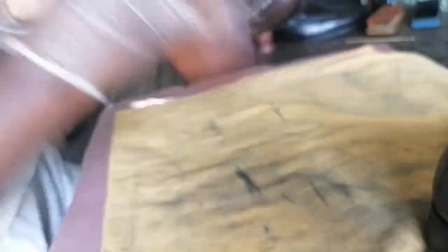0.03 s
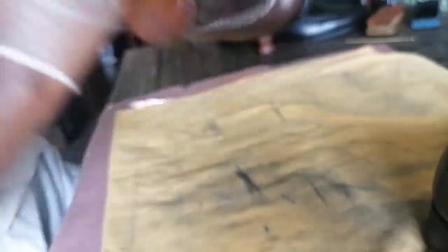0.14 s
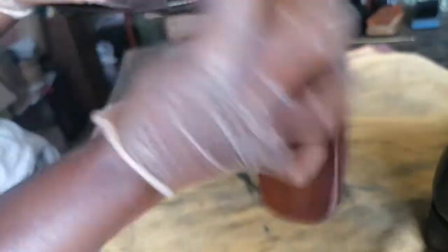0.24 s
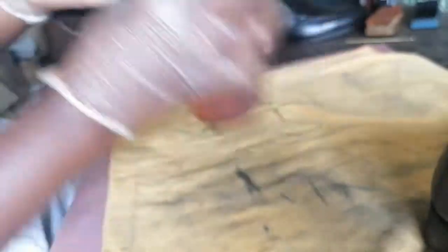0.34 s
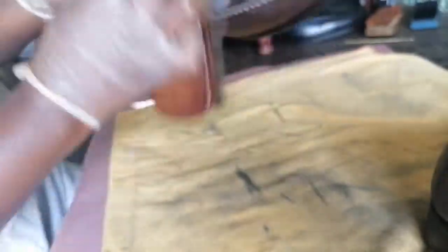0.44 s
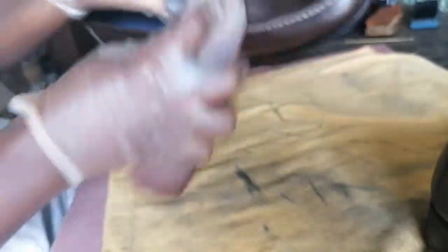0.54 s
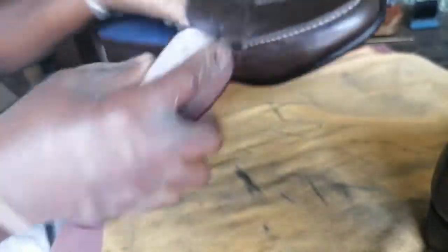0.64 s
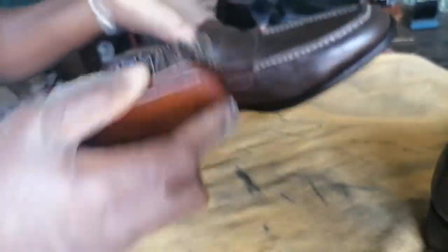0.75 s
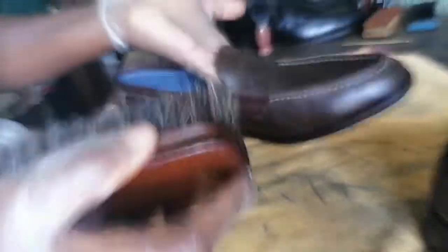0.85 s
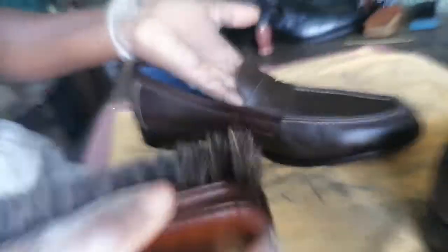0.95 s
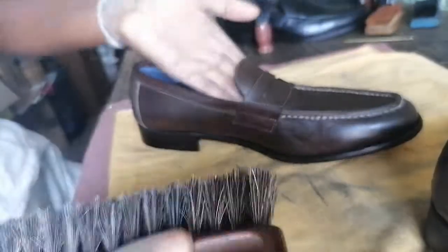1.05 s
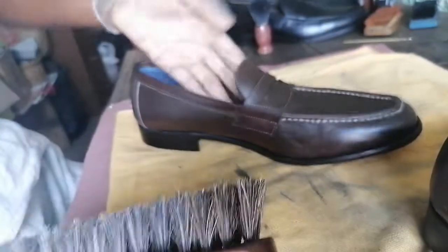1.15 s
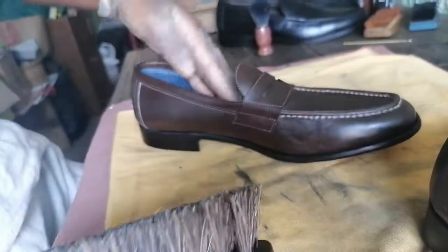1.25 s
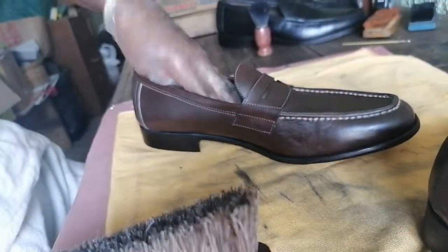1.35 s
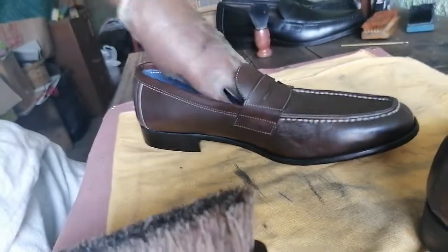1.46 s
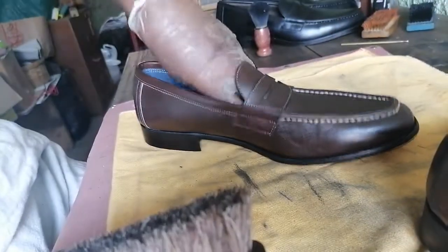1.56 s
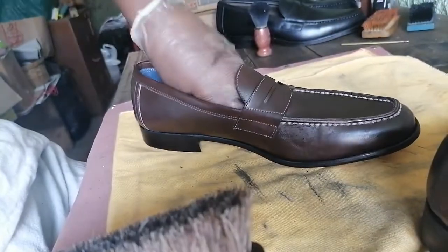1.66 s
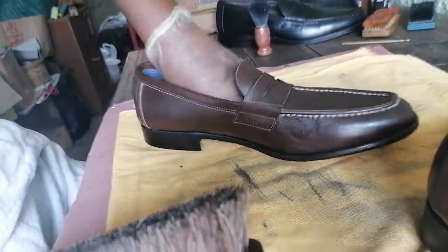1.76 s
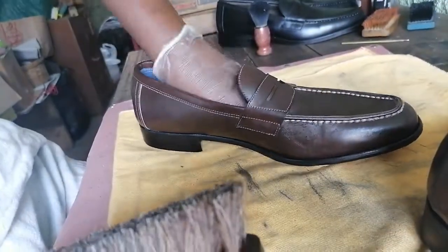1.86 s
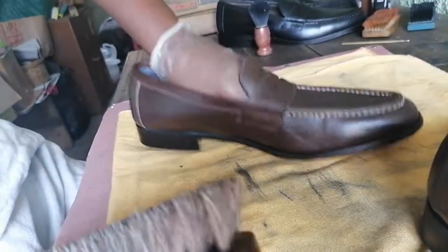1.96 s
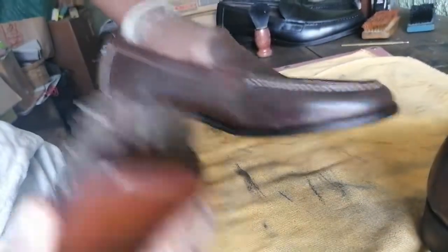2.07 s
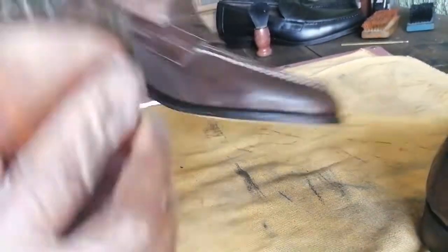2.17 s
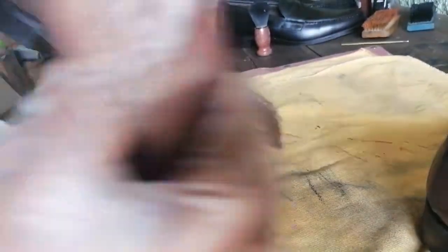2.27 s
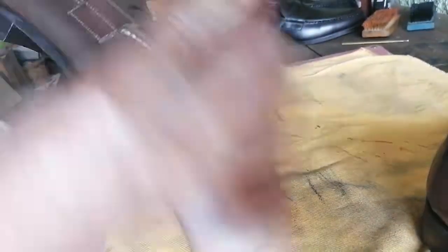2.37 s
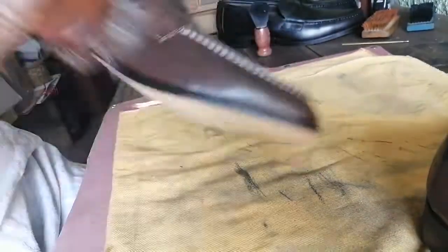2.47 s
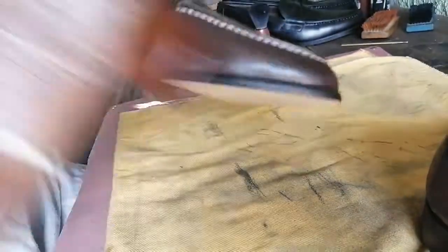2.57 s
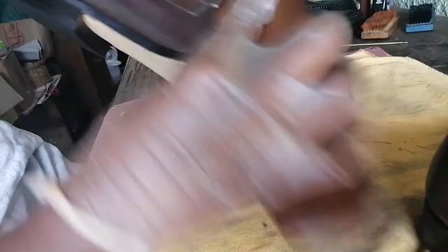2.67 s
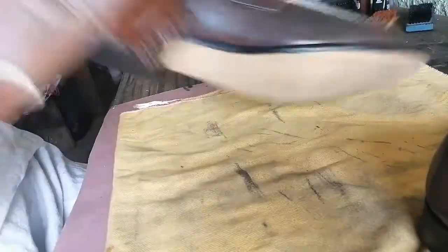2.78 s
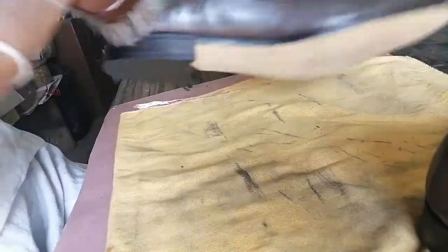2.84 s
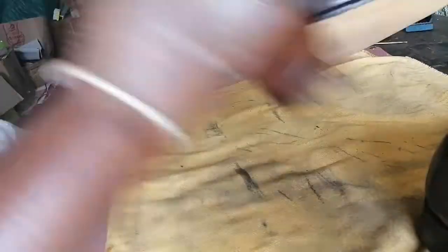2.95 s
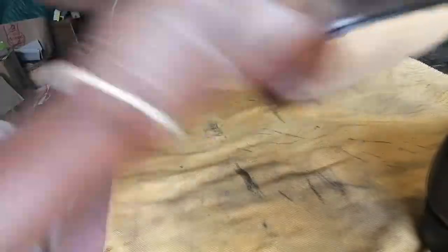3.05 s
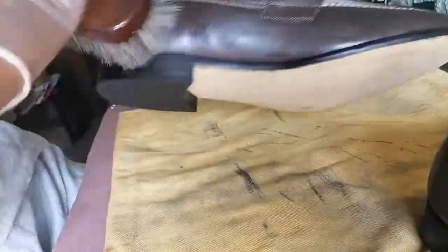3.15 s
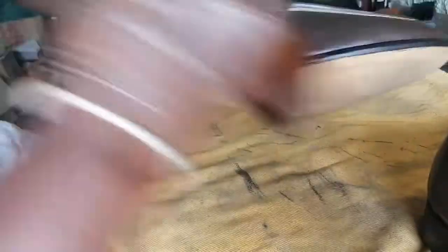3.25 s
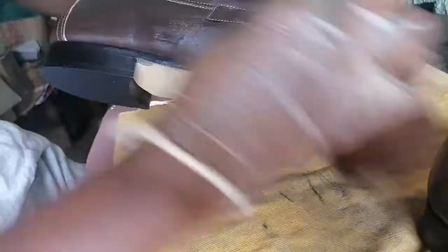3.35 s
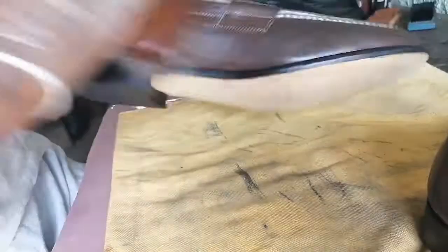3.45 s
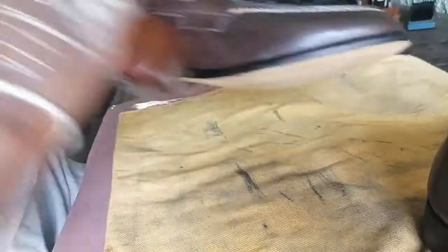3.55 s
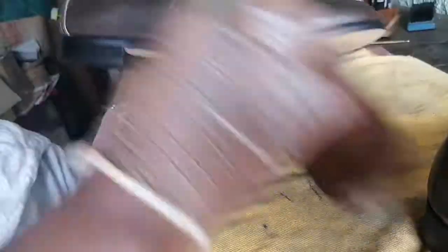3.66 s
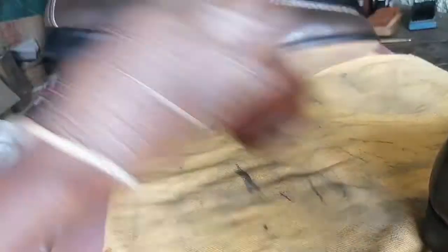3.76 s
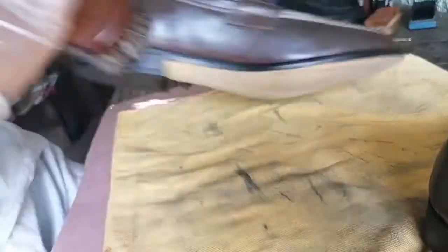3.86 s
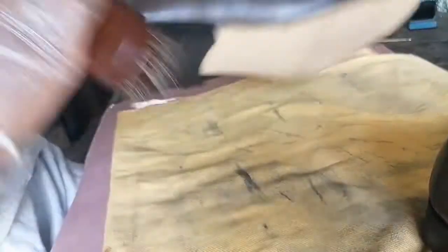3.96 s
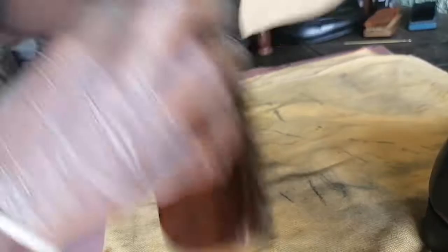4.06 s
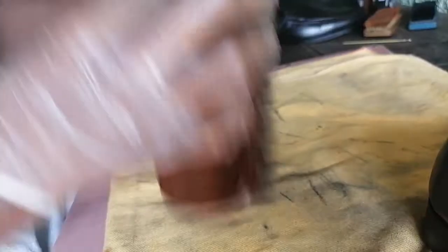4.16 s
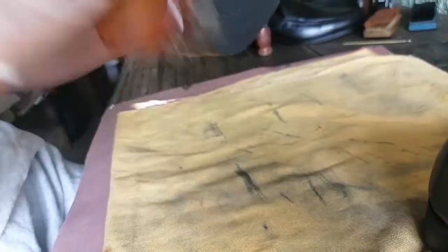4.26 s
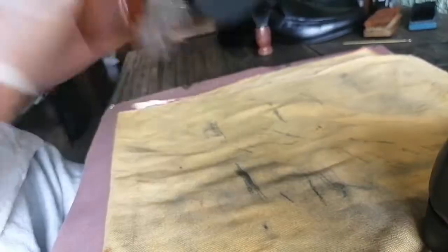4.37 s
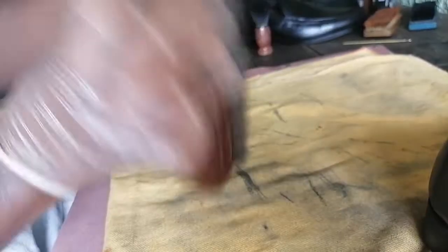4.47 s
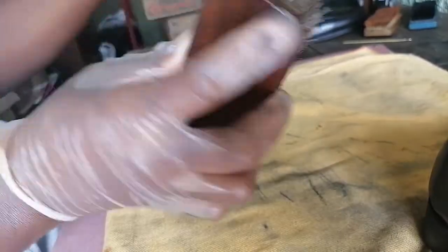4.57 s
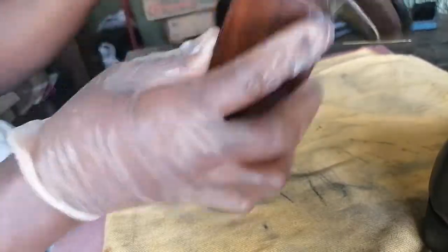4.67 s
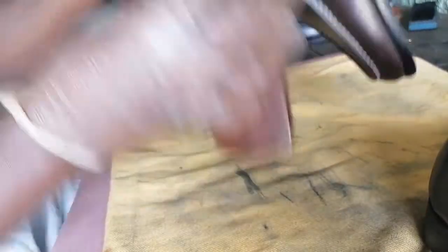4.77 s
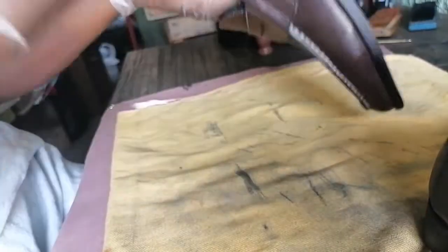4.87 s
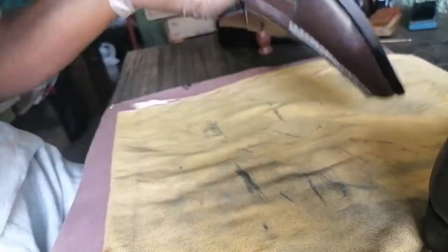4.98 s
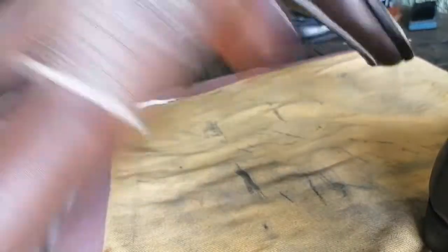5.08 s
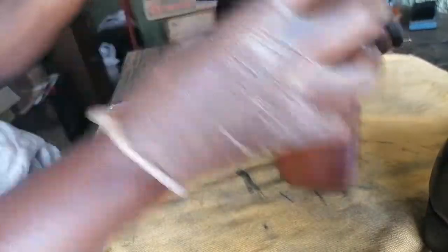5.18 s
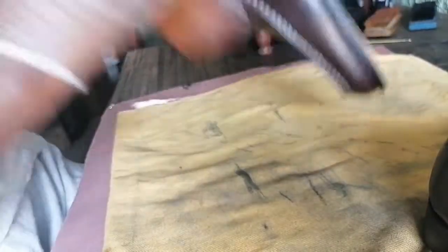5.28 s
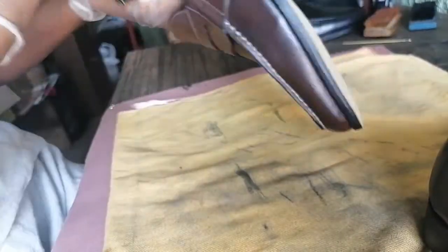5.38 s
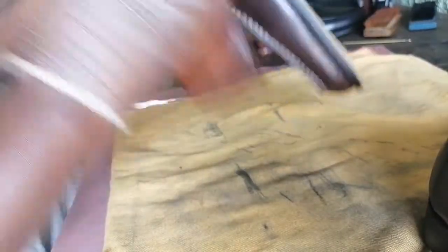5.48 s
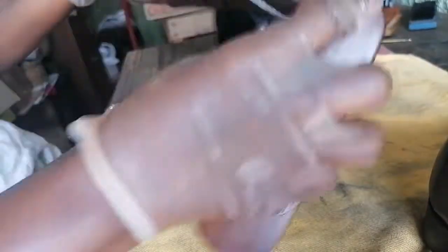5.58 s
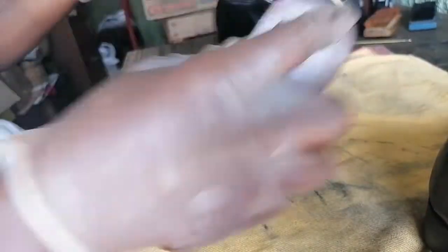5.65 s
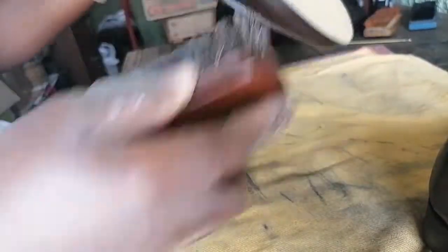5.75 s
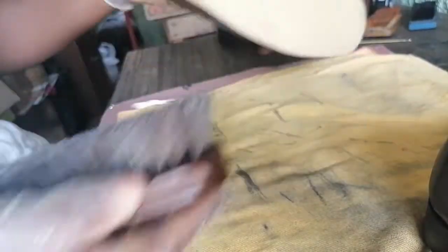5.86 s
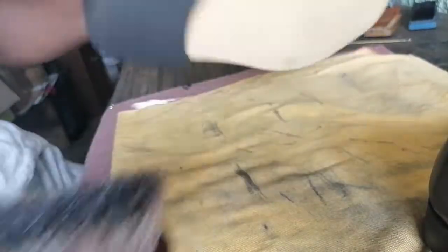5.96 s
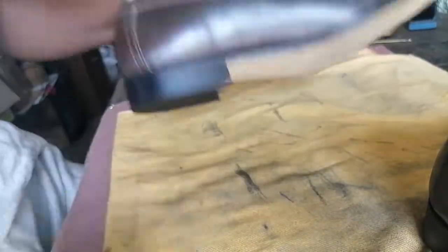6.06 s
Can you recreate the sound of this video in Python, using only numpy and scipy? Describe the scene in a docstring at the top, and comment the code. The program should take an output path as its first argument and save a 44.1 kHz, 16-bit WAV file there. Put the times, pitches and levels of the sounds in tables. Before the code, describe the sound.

A soft bristle brush swishes over a leather shoe in quick even strokes, broken by thuds and hollow knocks as the shoe is handled.

```python
"""Brushing a leather shoe

A horsehair brush buffs a leather shoe over a cloth-covered worktable, close to a phone on a stand.
Slipping bristles are random clicks, coloured into hiss, rasp and scrape; resonators make the shoe drone.
Knocks, block taps and table bumps are short sums of decaying modes; glove ticks are filtered noise.
Wavering sines hum as the stand, over a quiet room of random spectra."""
import sys
import numpy as np
from scipy import signal
from scipy.fft import rfft, irfft, next_fast_len
from scipy.io import wavfile
from scipy.ndimage import uniform_filter1d

SR = 44100
rng = np.random.default_rng(int(sys.argv[2]) if len(sys.argv) > 2 else 0)


def bounce(signal):
    """Save signal as a 16-bit WAV file at the path given by the first command-line argument."""
    frames = np.transpose(np.atleast_2d(signal))
    limited = np.clip(frames, -1, 1)
    pcm = np.round(limited * 32767).astype(np.int16)
    wavfile.write(sys.argv[1], SR, pcm)


N = 269872  # length in samples
HOP = 64  # samples between points of a level envelope
RAMP_DB, RAMP_BEND = 18, 0.88  # what a rise or fall spans in dB, and how round its top is


def gain_of(db):
    """Amplitude factor of a level in dB."""
    return 10 ** (np.asarray(db) / 20)


def evened(x):
    """Scales each channel to an RMS of 1."""
    return x / np.sqrt(np.mean(x ** 2, -1, keepdims=True) + 1e-20)


def read(points, hz):
    """Reads a curve of (Hz, value) points along log frequency."""
    f, value = np.transpose(points)
    return np.interp(np.log(hz + 1), np.log(f + 1), value)


def coloured(x, db_of):
    """Filters x by a gain in dB for each frequency."""
    size = next_fast_len(N)
    gain = gain_of(db_of(np.fft.rfftfreq(size, 1 / SR)))
    return irfft(rfft(x, size) * gain, size)[..., :N]


def add(mix, s, sound):
    """Adds a sound to the mix at s seconds, cut off at the end."""
    part = mix[..., round(s * SR):][..., :sound.shape[-1]]
    part += sound[..., :part.shape[-1]]


def resonate(x, hz, width):
    """Shifts the curve hz down to zero, smooths, and shifts back: a resonance of gain 1."""
    turn = np.exp(2j * np.pi * np.cumsum(hz * np.ones(N)) / SR) if np.ndim(hz) or x.shape[-1] == N \
        else np.exp(2j * np.pi * np.cumsum(hz * np.ones(x.shape[-1])) / SR)
    r = np.exp(-np.pi * width / SR)
    return 2 * (turn * signal.lfilter([1 - r], [1, -r], x / turn)).real


def resonate_twice(x, hz, width, second_width):
    """Two resonances in a row, for steeper skirts."""
    return resonate(resonate(x, hz, width), hz, second_width)


def drifting(noise, along_time, along_hz):
    """Smooths noise over (time, frequency) into patches with a spread of 1."""
    patches = uniform_filter1d(uniform_filter1d(noise, along_time, 1), along_hz, 0)
    return patches / patches.std()


def swell(peak, rise, hold, fall, bend=RAMP_BEND):
    """Level in dB of each event over time: up a ramp, level, down a ramp."""
    t = np.arange(0, N + HOP, HOP) / SR
    peak, rise, hold, fall = (np.reshape(v, (-1, 1)) for v in (peak, rise, hold, fall))
    before = (peak - t) / np.maximum(rise, 1e-3)
    after = (t - peak - hold) / np.maximum(fall, 1e-3)
    away = np.maximum(np.maximum(before, after), 0)
    return -RAMP_DB * away ** bend


def per_sample(envelope):
    """Stretches an envelope from one point a hop to every sample."""
    return np.interp(np.arange(N), np.arange(len(envelope)) * HOP, envelope)


def summed(db, rest_db):
    """Events add in power over a resting level."""
    return per_sample(10 * np.log10((gain_of(db) ** 2).sum(0) + gain_of(rest_db) ** 2))


# Colour of the room tone. Each row: frequency in Hz, relative level in dB per Hz.
AIR_COLOUR = [(15, -35), (25, 0.5), (80, 1.5), (242, -2.5), (439, -11), (775, -12), (1440, -29.5),
              (2990, -23), (3920, -34.5), (5280, -29), (7920, -30), (9320, -39.5), (11000, -53),
              (14800, -35), (16000, -45)]
# Likeness of the room tone in both ports. Each row: frequency in Hz, left-right correlation from -1 to 1.
AIR_LIKENESS = [(60, 0.87), (150, 0.94), (380, 0.91), (950, -0.53), (2380, -0.047), (5980, -0.045),
                (15000, -0.17)]


def air():
    """Room tone: random short-time spectra with drifting patches, partly alike in both ports."""
    level_db, patchy_db = -55.5, 1.5  # RMS level, and spread of the patches
    frames, hz = N // 256 + 5, np.fft.rfftfreq(1024, 1 / SR)
    a, b, c, d, noise = rng.standard_normal((frames, 513, 5)).T
    # the patches smooth over 12 bins and 14 frames
    patches = drifting(noise, 14, 12)
    same = np.clip(read(AIR_LIKENESS, hz), -1, 1)[:, None]
    left = a + 1j * b
    right = same * left + np.sqrt(1 - same ** 2) * (c + 1j * d)
    spectra = np.array([left, right]) * gain_of(read(AIR_COLOUR, hz)[:, None] + patchy_db * patches)
    tone = signal.istft(spectra, nperseg=1024, noverlap=768)[1][:, :N]
    return gain_of(level_db) * evened(tone)


# Swells of shaking. Each row: peak time in seconds, rise in seconds, fall in seconds,
# first stand mode in dB, second mode in dB, slow sway in dB.
SHAKE_SWELLS = [(.18, 0.17, 0.13, -43.5, -53, -51), (.41, 0.11, 0.086, -45, -61, -63),
                (.62, 0.46, .25, -48, -68, -58), (0.842, 0.29, 0.12, -45.5, -51, -50),
                (.975, .08, 0.038, -31, -45, -56), (1.085, .03, 0.14, -36, -31.5, -36),
                (1.25, 0.074, 0.39, -51, -60, -56), (1.51, 0.074, 0.1, -43, -50, -51),
                (1.89, 0.061, 0.096, -39.5, -41.5, -36.5), (2.24, 0.053, 0.031, -46, -36, -63),
                (2.358, 0.16, 0.31, -52, -59, -47.5), (2.72, .1, 0.076, -57, -74, -50.5),
                (2.99, .05, 0.14, -50.5, -75, -70), (3.31, .07, 0.065, -52.5, -72, -74),
                (3.65, 0.17, 0.067, -51, -72, -57), (3.84, .1, 0.07, -55, -66, -72),
                (4.07, 0.17, 0.091, -49.5, -52, -55), (4.37, 0.36, .1, -55.5, -69, -52),
                (4.82, 0.16, 0.13, -48.5, -55, -62), (4.92, 0.18, .07, -41, -50.5, -48),
                (5.3, 0.25, .4, -62, -75, -58), (5.83, 0.13, .15, -43, -56, -52),
                (6.12, 0.13, .1, -46, -56, -59)]
# The three modes between swells: levels in dB.
STILL_LEVELS = (-70, -71.5, -67.5)


def shaking():
    """Level of each stand mode over time, as the swells of shaking add in power."""
    s, rise, fall, *modes = np.transpose(SHAKE_SWELLS)[..., None]
    return [summed(db + swell(s, rise, 0, fall), still) for db, still in zip(modes, STILL_LEVELS)]


# Low modes of the stand. Each row: pitch in Hz, RMS pitch waver in Hz.
STAND_MODES = [(81.25, 5.73), (128.5, 9), (34.06, 8.24)]


def stand():
    """Shaking keeps the low modes humming, pitch wavering; the two ends of the phone move a little apart."""
    out = np.zeros((2, N))
    for db, (hz, waver_hz) in zip(shaking(), STAND_MODES):
        noise = rng.standard_normal((2, N))
        waver, apart = evened(uniform_filter1d(uniform_filter1d(noise, 2000), 2000))
        turns = np.cumsum(hz + waver_hz * waver) / SR + rng.random()
        phase_apart = np.outer([1, -1], 0.16 * apart)  # radians
        # the root of 2 makes the levels RMS
        out += np.sqrt(2) * gain_of(db) * np.sin(2 * np.pi * turns + phase_apart)
    return out


# Bumps through the table. Each row: start in seconds, peak in dB, contact time in seconds.
TABLE_BUMPS = [(0.915, -20.5, 0.0062), (1.053, -11.5, 0.0045), (1.078, -24.5, 0.0063), (1.544, -32, 0.0058),
               (1.856, -28.5, 0.0114), (1.901, -31, 0.0049)]
# Modes of the table top. Each row: pitch in Hz, relative level in dB, t60 in seconds.
TABLE_MODES = [(40, -5, 0.063), (84.7, 3.5, 0.077), (131, -13, 0.1), (190, 2.5, 0.028), (252, -28, 0.11),
               (346, -4, 0.027)]


def bumps():
    """A soft push of given contact time rings the table top."""
    out, t = np.zeros(N), np.arange(SR // 2) / SR
    ring = -sum(gain_of(db - 60 * t / t60) * np.sin(2 * np.pi * hz * t) for hz, db, t60 in TABLE_MODES)
    for s, db, contact in TABLE_BUMPS:
        push = np.diff(np.hanning(max(round(contact * SR), 8)))  # felt as velocity
        bump = signal.oaconvolve(ring, push)
        add(out, s, gain_of(db) * bump / abs(bump).max())
    return out


# Dry ticks of the thin glove. Each row: start in seconds, level in dB before the filter.
GLOVE_TICKS = [(1.076, -39.5), (2.1188, -43.5), (2.2108, -40), (2.258, -57), (2.2987, -57), (2.3294, -52),
               (4.4506, -47), (5.1103, -53)]


def ticks():
    """Each tick is a quickly dying burst of noise, filtered bright."""
    out, t = np.zeros((2, N)), np.arange(SR // 50) / SR
    for s, db in GLOVE_TICKS:
        add(out, s, gain_of(db - 60 * t / 0.019) * rng.standard_normal((2, len(t))))
    return resonate(out, 6000, 2400)


# The edge of the wooden brush block taps the leather.
# Each row: start in seconds, level in dB on top of the partials, pitch in Hz, t60 in seconds.
BLOCK_TAPS = [(2.507, -27, 2350, 0.022), (4.934, -28.5, 1420, 0.039)]
# Partials of the block. Each row: multiple of the pitch, relative level in dB.
BLOCK_PARTIALS = [(1, -4), (1.5, -9.5), (2.2, -27)]


def taps():
    """The brush block rings short and high, all its partials dying together."""
    out, t = np.zeros(N), np.arange(SR // 10) / SR
    for s, db, hz, t60 in BLOCK_TAPS:
        ring = sum(gain_of(level) * np.sin(2 * np.pi * k * hz * t) for k, level in BLOCK_PARTIALS)
        add(out, s, gain_of(db - 60 * t / t60) * ring)
    return out


# Knocks on the shoe. Each row: start in seconds, peak in dB before panning, pitch in Hz, t60 in seconds,
# left-right difference in dB, hardness in dB per octave, rise in seconds.
SHOE_KNOCKS = [(0.242, -37.5, 440, 0.077, 6, -21, 0.0034), (0.294, -32, 426, 0.047, 12, -8, 0.0032),
               (1.354, -48, 446, 0.034, -7, -9, 0.0012), (1.546, -34, 465, 0.074, 5.5, -1, 0.0015),
               (1.601, -46.5, 570, 0.081, -8, -28, 0.002), (1.8, -34, 718, 0.064, 4, 7, 0.00087),
               (1.81, -28, 634, 0.05, -4.5, -1, 0.0033), (2.21, -15.5, 353.4, 0.041, -3, 5, 0.0046),
               (2.506, -43, 298, 0.092, 15, -20, .001), (3.695, -29.5, 427, 0.04, 7, 3, 0.0015),
               (3.712, -17, 351.5, 0.043, 3.5, -5.5, 0.011), (3.732, -41, 342, 0.051, -11, -3, 0.0027),
               (4.487, -35, 455, 0.035, -5, 15, 0.00098), (4.696, -42, 389, 0.074, 8, -22, 0.0028),
               (4.94, -38.5, 432, 0.046, 8, -29, 0.0027), (5.238, -34.5, 459, 0.1, 9.5, -22, 0.0045)]
# Modes of the hollow shoe. Each row: multiple of the pitch, relative level in dB, share of the t60.
SHOE_MODES = [(.42, -34, 1), (1.001, 7, 0.58), (1.34, 5.5, 0.47), (1.698, -3, 0.51), (2.4, -27, 0.97),
              (2.9, -36, 0.5), (3.9, -57, 0.44)]


def knocks():
    """The shoe rings briefly at its modes; a harder blow wakes the upper ones."""
    out, t = np.zeros((2, N)), np.arange(SR // 4) / SR
    for s, db, hz, t60, pan_db, hard_db, rise in SHOE_KNOCKS:
        ring = 0
        for k, level, share in SHOE_MODES:
            mode_db = level + hard_db * np.log2(max(k, 1)) - 60 * t / (share * t60)
            ring = ring + gain_of(mode_db) * np.sin(2 * np.pi * k * hz * t)
        ring = ring * (1 - np.exp(-2 * t / max(rise, 1e-4))) ** 2
        pan = gain_of([[pan_db / 2], [-pan_db / 2]])
        add(out, s, gain_of(db) * ring / abs(ring).max() * pan)
    return out


def slips(per_s, spread_db):
    """Bristle tips catch and let go: clicks of random sign, a few large; each port hears other tips."""
    size = gain_of(spread_db * np.minimum(rng.exponential(1, (2, N)), 5))
    return size * rng.choice([-1., 1.], (2, N)) * (rng.random((2, N)) < per_s / SR)


def patchy(x, patchy_db):
    """The colour shifts in patches as other parts of the brush meet other parts of the shoe."""
    z = signal.stft(x, nperseg=256)[2]
    patches = drifting(rng.standard_normal(z.shape[1:]), 10, 5)
    return evened(signal.istft(z * gain_of(patchy_db * patches), nperseg=256)[1][:, :N])


# Brush strokes. Each row: start in seconds, rise in seconds, hold in seconds, fall in seconds, hiss in dB,
# airy top in dB re hiss, dig peak in seconds after the start, dig fall in seconds, scrape in dB,
# low rasp in dB, drone peak in seconds after the start, hollow drone in dB, hollow pitch in Hz,
# growth of the hiss over the hold in dB, drone fall in seconds, lower hiss in dB re hiss,
# ring of the upper in dB re hiss.
BRUSH_STROKES = [ (0.0, 0.00033, 0.029, 0.078, -41.5, -3.5, 0.017, 0.08, -47, -52, 0.018, -39.5, 410, -1.5, 0.054, -14, -24),
                 (0.089, 0.077, 0.038, 0.058, -42, -1.5, 0.067, 0.19, -53, -58.5, 0.086, -41, 512, -1, 0.082, -16, -27),
                 (0.238, 0.044, 0.037, .1, -40, -6, 0.067, 0.092, -46, -48.5, 0.051, -38.5, 438, -1, 0.083, -16, -20),
                 (0.418, 0.08, 0.0086, 0.093, -42, -7, 0.067, 0.24, -50.5, -54.5, 0.091, -35, 482, -2.5, .06, -18, -28),
                 (0.548, 0.057, 0.082, 0.054, -50, -14, 0.083, 0.098, -51, -46, 0.072, -44, 560, -3.5, 0.11, -15, -5),
                 (2.503, 0.0027, 0.084, 0.068, -38, -7, 0.0067, 0.074, -39, -49.5, 0.025, -42.5, 372, 1.5, 0.063, -16.5, -26),
                 (2.638, 0.036, 0.072, 0.073, -40, -5.5, 0.069, 0.1, -51, -66, .05, -50, 368, -0.5, 0.079, -23, -28),
                 (2.79, 0.02, 0.12, 0.075, -40.5, -7, 0.053, 0.099, -41.5, -44, 0.043, -40.5, 400, -3, 0.075, -19.5, -26),
                 (2.985, 0.0089, 0.11, 0.046, -42, -6.5, 0.046, 0.21, -53.5, -62.5, 0.035, -51.5, 320, -0.5, 0.053, -17.5, -20.5),
                 (3.131, 0.038, 0.09, 0.035, -41.5, -8, 0.054, 0.084, -48.5, -57.5, 0.038, -46, 536, 1, 0.058, -19, -27),
                 (3.29, 0.03, 0.1, 0.078, -40, -8, 0.08, 0.14, -48.5, -59.5, 0.095, -48, 338, -1.5, 0.16, -19.5, -14),
                 (3.458, 0.049, 0.083, 0.061, -39, -8, 0.035, 0.1, -50, -57.5, .05, -43.5, 394, -0.5, 0.08, -25, -25),
                 (3.641, 0.023, 0.14, 0.051, -44, -10.5, 0.07, 0.18, -52, -63, 0.11, -39.5, 355, 0, 0.081, -18, -18),
                 (3.838, .047, 0.069, 0.11, -39.5, -8, 0.086, 0.098, -48, -67, 0.029, -48.5, 373, -1, 0.1, -27, -31),
                 (4.05, .03, 0.11, 0.045, -57, -10, 0.097, .12, -66, -69, .09, -80, 370, -1, .12, -15, -20),
                 (4.471, 0.026, 0.074, 0.062, -44, -5, 0.036, 0.097, -46.5, -44.5, 0.034, -43, 470, 0, 0.082, -6.5, -12.5),
                 (4.93, 0.005, 0.067, 0.09, -42.5, -5, 0.013, 0.074, -45, -50.5, 0.018, -47, 385, 2.5, 0.06, -15, -26),
                 (5.095, 0.023, 0.14, 0.058, -43, -3, 0.099, .08, -45.5, -50, 0.13, -51, 464, 5, 0.11, -15, -24),
                 (5.3, .03, .1, 0.063, -46.5, -1, 0.077, 0.1, -52.5, -57, 0.058, -42.5, 471, 5.5, 0.082, -15.5, -21),
                 (5.498, 0.083, 0.067, 0.063, -44, -2.5, 0.11, 0.075, -48.5, -54, 0.12, -44, 450, -0.5, 0.066, -11.5, -14.5),
                 ]
# Slides of the gloved hand in and on the shoe, and the shoe droning on after the knock at 2.21 s, with the
# columns of the strokes.
HAND_SLIDES = [ (.93, 0.12, 0.006, 0.038, -60, -14, 0.065, 0.17, -76, -69, 0.13, -45.5, 338, -0.21, .1, -14, -12),
               (1.081, 0.011, 0.021, 0.16, -58.5, -32, 0.0091, 0.088, -48.5, -47, 0.008, -39.5, 389, -2.3, 0.083, 3, -3),
               (1.2, 0.05, 0.024, 0.052, -57.5, -15, .05, 0.12, -78, -67, 0.031, -72, 433, -0.32, .1, -17, -12),
               (1.309, .002, 0.023, .03, -70, -14, .022, 0.064, -47.5, -52, 0.017, -59, 410, -0.39, 0.086, -19, -5),
               (1.351, 0.0033, 0.011, .14, -50.5, -40, 0.014, .1, -45, -40, 0.0074, -41, 465, -2.3, 0.092, -2, 5),
               (1.5, 0.02, .005, 0.13, -60.5, -12, .046, 0.3, -71, -67, 0.055, -50, 516, -0.23, 0.18, -25, -5),
               (1.749, 0.022, 0.03, .04, -67, -20, .068, 0.039, -70, -45.5, 0.061, -50, 570, 0.21, 0.11, 0.5, -11),
               (1.85, 0.03, 0.022, 0.13, -67, -11, .07, 0.45, -71, -67.5, 0.088, -61, 332, 0, 0.12, -10, 5),
               (2.0, 0.063, 0.012, 0.19, -59.5, -7, 0.044, 0.19, -78, -66, .068, -50.5, 360, -0.28, 0.086, -19, -6),
               (2.211, 0.011, .02, .1, -81, -37, 0.01, 0.074, -85, -58, 0.018, -34.5, 349, 0, 0.085, -14, 21),
               (2.34, 0.036, .01, 0.075, -68, -6, 0.096, 0.11, -77, -68, .04, -67, 354, 0, .1, -10, -1),
               (4.29, 0.028, .01, 0.045, -72, -8, 0.046, 0.27, -87, -67, 0.025, -61, 400, 0, .1, -12, 1),
               (4.68, .05, 0.06, 0.11, -77, -13, 0.042, 0.26, -73, -69, 0.069, -53.5, 415, 0.19, 0.1, -12, 7),
               (5.8, .14, 0.016, 0.058, -72.5, -13, 0.094, 0.096, -86, -73, 0.12, -82, 383, 0, 0.12, -27, -12),
               (6.03, 0.089, .05, .05, -75, -10, 0.11, .08, -68, -70, 0.093, -45.5, 477, 0, 0.053, -14, 0),
               ]
# Scrape and hollow all through a stroke: levels in dB re hiss.
UNDER_HISS = (-25.5, -39)
# A hand that only holds the shoe: hiss, airy top, lower hiss, upper, rasp, scrape and hollow in dB.
RESTING_LEVELS = (-80, -84, -100, -95, -71.5, -84, -67)


def pressure():
    """Each stroke lands, sweeps and lifts; at one moment the tips dig in, at one the shoe drones."""
    dig_rise, drone_rise = 0.58, 0.44  # rise of a dig or drone as a share of its fall
    dig_bend = 1.3  # digs and drones have flatter tops and firmer edges
    columns = np.transpose(BRUSH_STROKES + HAND_SLIDES)[..., None]
    (s, rise, hold, fall, hiss, airy, dig, dig_fall, scrape, rasp,
     drone, hollow, hz, grow, drone_fall, dull, upper) = columns
    t = np.arange(0, N + HOP, HOP) / SR
    along = np.clip((t - s - rise) / (abs(hold) + 1e-3), 0, 1)
    sweep = hiss + swell(s + rise, rise, abs(hold), fall) + grow * (along - .5)
    # once landed, the brush stays down far longer than a dig or drone
    landed = np.minimum(swell(s + rise, rise, 9, 1) + RAMP_DB / 2, 0)
    digging = landed + swell(s + dig, dig_rise * dig_fall, 0, dig_fall, dig_bend)
    droning = hollow + landed + swell(s + drone, drone_rise * drone_fall, 0, drone_fall, dig_bend)
    scrape_under, hollow_under = UNDER_HISS
    layers = [sweep, sweep + airy, sweep + dull, sweep + upper, rasp + digging,
              np.vstack([scrape + digging, sweep + scrape_under]),
              np.vstack([droning, sweep + hollow_under])]
    # the hollow pitch follows the loudest event
    loudest = np.maximum(droning, sweep + hollow_under).argmax(0)
    pitch = per_sample(uniform_filter1d(hz[loudest, 0], 15))
    return [summed(db, rest) for db, rest in zip(layers, RESTING_LEVELS)] + [pitch]


# Thin squeak. Each row: time in seconds, level in dB.
SQUEAK_LEVEL = [(3.65, -90), (3.694, -62), (3.766, -65), (3.826, -80), (3.874, -48.5), (3.95, -69),
                (4.06, -62.5), (4.092, -88), (4.183, -73), (4.3, -96)]


def squeak(coarse):
    """A narrow resonance picks a thin squeak out of the coarse slips."""
    s, db = np.transpose([(0, -120)] + SQUEAK_LEVEL + [(4.35, -120)])
    level_db = np.interp(np.arange(N) / SR, s, db)
    return gain_of(level_db) * evened(resonate_twice(coarse, 2050, 70, 140))


# Colours of hiss, airy top, scrape and rasp. Each row: frequency in Hz, relative level in dB per Hz.
HISS_COLOUR = [(2240, -27), (3800, -30.5), (4880, -11.5), (6100, -14), (6940, -2), (7980, -1), (9160, 4),
               (9780, 1.5), (10900, -14.5), (11500, -15.5), (15000, -72), (22000, -120)]
AIRY_COLOUR = [(6180, -73), (10500, -0.5), (13200, -0.5), (14900, -2), (15500, -2), (16000, -3)]
SCRAPE_COLOUR = [(1200, -80), (1600, -22), (1750, -4), (2050, 2), (2300, -0.5), (3180, 0), (3740, -12),
                 (4300, -6), (5000, -40)]
RASP_COLOUR = [(600, -5.5), (850, -0.5), (1250, 0), (1600, -4), (2200, -31)]
# Resonances of the hollow shoe. Each row: multiple of the hollow pitch, width in Hz, relative level in dB.
HOLLOW_MODES = [(1, 120, 13.5), (1.5, 22, 5)]


def rubbing():
    """Fine slips hiss, coarser ones scrape and rasp, and the drag shakes the air inside the shoe."""
    hiss_db, airy_db, dull_db, upper_db, rasp_db, scrape_db, hollow_db, hz = pressure()
    fine = patchy(slips(per_s=20000, spread_db=2.5), patchy_db=2.05)
    coarse = patchy(slips(per_s=8000, spread_db=2.0), patchy_db=3.5)
    drag = slips(per_s=2500, spread_db=2.0)
    drag = drag + .5 * drag[::-1]  # long waves reach both ports alike

    hiss = evened(coloured(fine, lambda f: read(HISS_COLOUR, f)))
    airy = evened(coloured(fine, lambda f: read(AIRY_COLOUR, f)))
    dull = evened(resonate_twice(fine, 5490, 3000, 3000))  # the lower part of the hiss
    scrape = evened(coloured(coarse, lambda f: read(SCRAPE_COLOUR, f)))
    rasp = evened(coloured(coarse, lambda f: read(RASP_COLOUR, f)))
    hollow = evened(sum(gain_of(db) * resonate_twice(drag, k * hz, w, 2 * w) for k, w, db in HOLLOW_MODES))
    upper = evened(resonate_twice(drag, 720, 46, 92))  # the leather upper rings at one pitch

    bristles = gain_of(hiss_db) * hiss + gain_of(airy_db) * airy + gain_of(dull_db) * dull
    bristles = np.sqrt(2) * bristles  # unrelated ports sum in power
    grating = gain_of(scrape_db) * scrape + gain_of(rasp_db) * rasp
    shoe = gain_of(hollow_db) * hollow + gain_of(upper_db) * upper
    return bristles + grating + shoe + squeak(coarse)


# Decay of the room. Each row: frequency in Hz, t60 in seconds.
ROOM_DECAY = [(100, 0.42), (400, 0.31), (1500, 0.42), (8000, 0.27)]


def room(x):
    """Sparse echoes of random sign, one in every 20 samples, each band dying at its own speed."""
    echoes = np.zeros((2, SR // 2))
    at = np.arange(300, SR // 2 - 20, 20) + rng.integers(0, 20, (2, (SR // 2 - 301) // 20))
    np.put_along_axis(echoes, at, rng.choice([-1., 1.], at.shape), 1)
    hz, t, z = signal.stft(echoes, SR, nperseg=256)
    decay = gain_of(-60 * t / read(ROOM_DECAY, hz)[:, None])
    tail = signal.istft(z * decay, SR, nperseg=256)[1]
    return signal.fftconvolve(x, tail / np.linalg.norm(tail[0]), axes=1)[:, :N]


def scene():
    """Mixes all sources; each close sound sends its own share into the room."""
    hits, rub, thuds, block = knocks() + ticks(), rubbing(), bumps(), taps()
    sends = gain_of(-9) * hits + gain_of(-15.5) * rub + gain_of(-5.5) * thuds + gain_of(-17) * block
    return hits + block + rub + thuds + room(sends) + stand() + air()


# Colour of the two microphone ports. Each row: frequency in Hz, left-right difference in dB.
PORT_COLOUR = [(60, 4.5), (92, -3.5), (140, 2), (210, -3), (330, 5.5), (500, 0.5), (770, -2.5), (1170, 0.5),
               (1790, 2), (2740, 0.5), (4190, 0.5), (6410, -6.5), (9810, 9.5), (15000, -2.5)]


def record(dry):
    """Each port has its own colour, the deepest bass is cut; then the band limit."""
    ports = coloured(dry, lambda f: np.outer([.5, -.5], read(PORT_COLOUR, f)))
    ports = signal.sosfilt(signal.butter(2, 30, "high", fs=SR, output="sos"), ports)
    band_limit = signal.firwin(1023, 15850, window=("kaiser", 9), fs=SR)  # cutoff in Hz
    return signal.oaconvolve(ports, band_limit[None], "same")


dry = scene()
out = record(dry)
bounce(out)
```